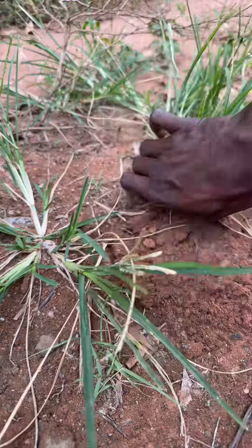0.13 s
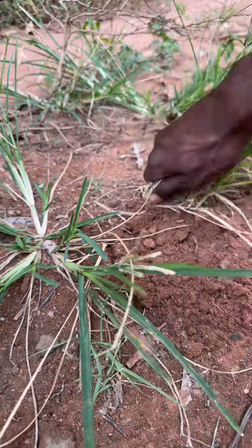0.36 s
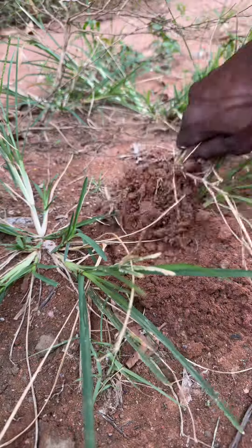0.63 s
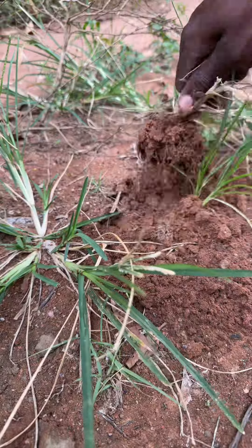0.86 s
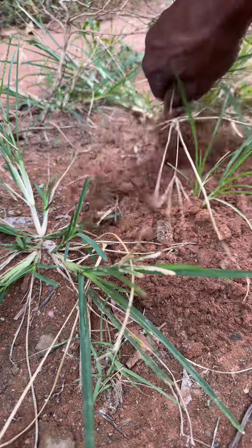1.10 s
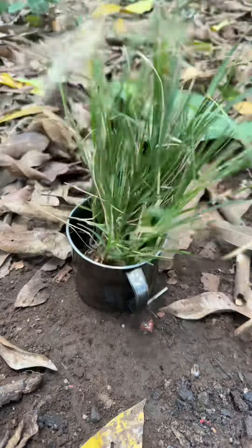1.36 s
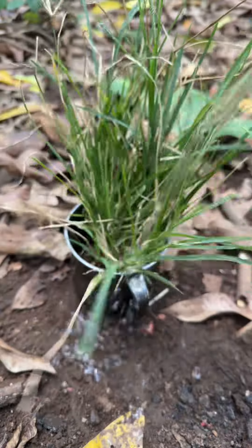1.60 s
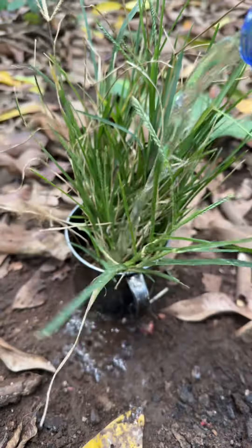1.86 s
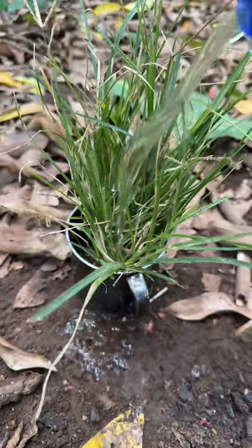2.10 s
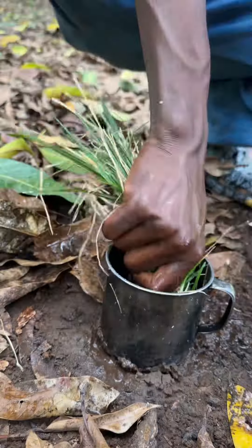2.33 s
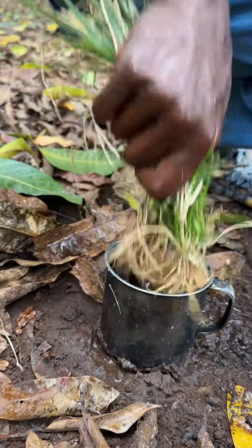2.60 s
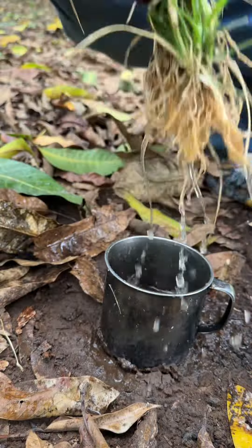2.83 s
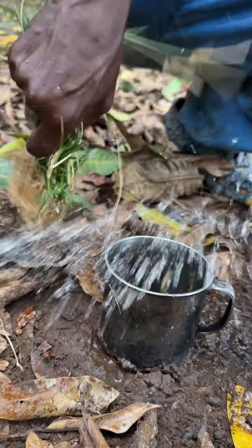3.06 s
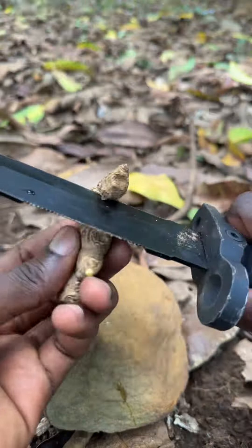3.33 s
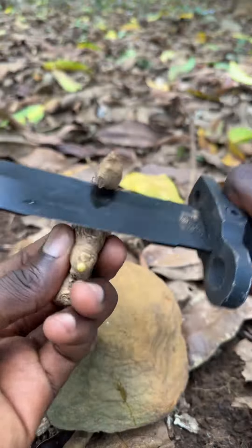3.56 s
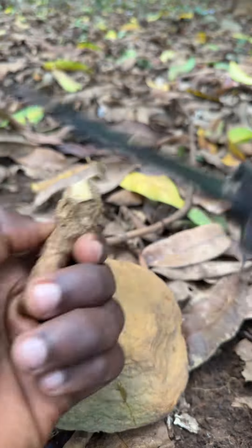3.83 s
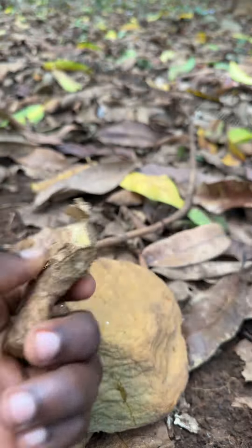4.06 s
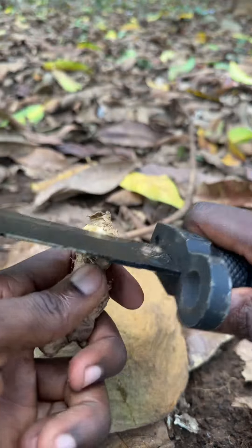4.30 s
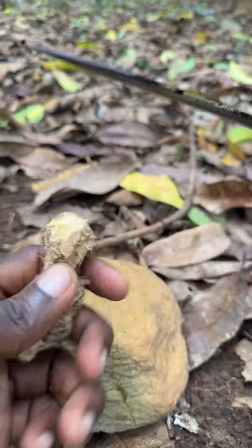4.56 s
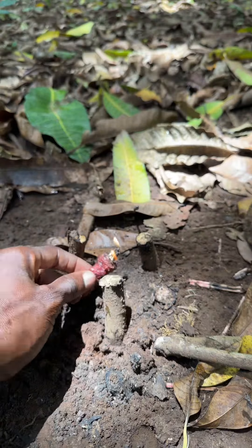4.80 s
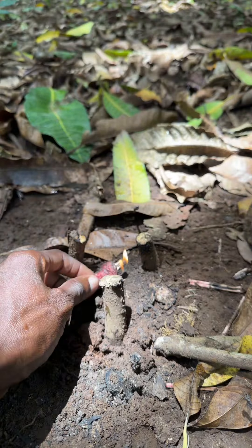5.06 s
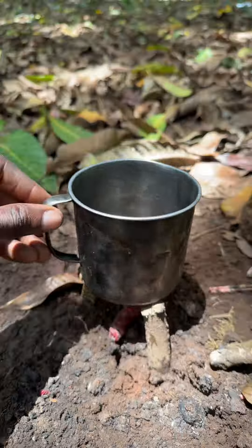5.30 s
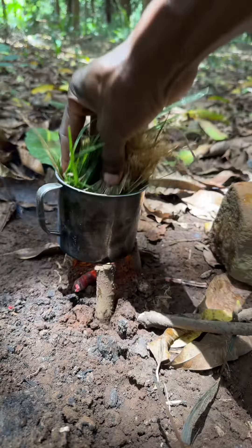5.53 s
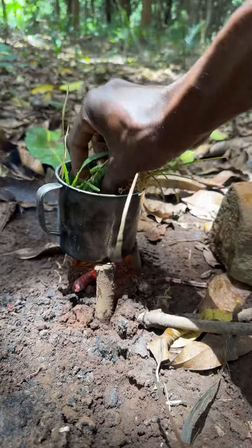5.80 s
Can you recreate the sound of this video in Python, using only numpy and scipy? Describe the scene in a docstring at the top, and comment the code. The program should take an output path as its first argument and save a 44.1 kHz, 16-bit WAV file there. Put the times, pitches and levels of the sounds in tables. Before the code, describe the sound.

Close, dry outdoor sounds in short, abruptly cut shots. Wind rumble and soft air hiss open the scene, with faint bird whistles; at 0.4-0.55 s roots tear in a cluster of rough low pops, with a tick near 1.0. At 1.15-1.25 s grass rustles brightly and knocks a steel mug, briefly clanking. From 1.4 to 2.2 s water splashes through the grass with sharp slaps and small bubbles. It quietens, then drops plink hollowly inside the mug from 2.6, strongest near 2.75 and 2.94. At 3.0 s comes the loudest event, a wet whipping crack. Bird chirps and a faint low hum follow while a knife snaps a root at 3.5 and 3.68, with thin high blade rings, and cuts again at 4.3-4.5. Near silence, faint finger rustle at 4.85, soft mug taps at 5.14 and 5.29, then grass crushed in from 5.38, with small snaps at 5.54 and 5.73.

```python
"""Outdoors on open ground, in short shots cut together, the microphone close to the hands: a grass tuft is torn
from the soil, set in a steel mug and watered, lifted dripping and shaken; a knife pares a root; the mug is set
on a stand and stuffed with grass. Hands, grass and water are clouds of noise puffs and tiny rings; drops are
gliding bubbles, the mug a bank of modes, snaps and ticks short noise. Wind rumbles on the microphone, birds
whistle far off, a faint hum comes and goes, and the hiss of the air changes at two of the cuts."""
import sys
import numpy as np
from scipy import signal
from scipy.fft import rfft, irfft, next_fast_len
from scipy.io import wavfile
from scipy.ndimage import uniform_filter1d

SR = 44100
rng = np.random.default_rng(int(sys.argv[2]) if len(sys.argv) > 2 else 0)


def voltage_ratio(decibels):
    """Convert decibels (scalar or array-like) to amplitude ratios, 20 dB per decade."""
    exponent = np.asarray(decibels, float) / 20
    return 10 ** exponent


def log_audio(samples):
    """Write samples as a 16-bit WAV file to the path given in sys.argv[1]."""
    # one column per channel
    frames = np.atleast_2d(samples).T
    # limit to full scale, then quantise
    limited = np.clip(frames, -1, 1)
    pcm = np.round(limited * 32767).astype(np.int16)
    wavfile.write(sys.argv[1], SR, pcm)


N = 260631  # length in samples

# moments at which one shot gives way to the next: cut_s
CUTS_S = (1.137, 2.235, 3.172, 3.762, 4.66, 5.128, 5.38, 5.89)


def read(points, hz):
    """Reads a table on a log-frequency axis."""
    f, value = np.transpose(points)
    return np.interp(np.log(hz + 1), np.log(f + 1), value)


def evened(x):
    """Scales to rms 1."""
    return x / np.sqrt(np.mean(x ** 2) + 1e-20)


def coloured(x, colour):
    """Filters by a spectrum of (hz, relative db), then scales to rms 1."""
    size = next_fast_len(len(x) + 4096)
    hz = np.fft.rfftfreq(size, 1 / SR)
    filtered = irfft(rfft(x, size) * voltage_ratio(read(colour, hz)), size)
    return evened(filtered[:len(x)])


def wander(hz):
    """Slow random drift of rms 1: noise averaged twice over 1 / hz seconds."""
    width = int(SR / hz)
    once = uniform_filter1d(rng.standard_normal(N), width)
    return evened(uniform_filter1d(once, width))


def add(mix, s, sound, pan_db=0):
    """Mixes a sound in at time s; pan_db is left against right."""
    part = mix[:, round(s * SR):][:, :len(sound)]
    sides = voltage_ratio(np.array([[.5], [-.5]]) * pan_db)
    part += sides * sound[:part.shape[1]]


def dying(seconds, t60, rise):
    """Time axis and an envelope with a quick rise and an exponential fall."""
    t = np.arange(round(seconds * SR)) / SR
    return t, (1 - np.exp(-t / rise)) * voltage_ratio(-60 * t / t60)


def air():
    """Wide hiss of the place: coloured noise in the middle and at the side, with a gently drifting level."""
    # air from each moment on: start_s, mid_level_db, side_level_db,
    # mid colour and side colour as (hz, relative_db)
    airs = [(0, -69.5, -65, [(180, -29), (300, -4), (1300, -33.5), (1690, -16.5), (2210, -10.5), (8360, -6),
            (9550, -8.5), (10600, -52), (11700, -16.5), (14500, -27), (16000, -19)], [(180, -25), (300, 10),
            (519, -1), (7950, -8), (10200, -2), (11700, -13), (12500, -40), (13500, -9), (16000, -13)]),
            (1.137, -70.5, -71, [(180, -47), (300, -4.5), (915, -12), (1300, -14), (2520, -2), (5700, -6),
            (6960, -9), (7320, -43.5), (8640, -34), (9090, -22.5), (10600, -22), (13100, -27),
            (16000, -58.5)], [(180, -43.5), (300, -10), (2320, -11), (2570, -6), (3950, -25), (8500, -6),
            (9880, -16), (10900, -44), (16000, -22)]), (3.763, -77.5, -76, [(180, -45), (300, 1),
            (1010, -7.5), (2140, -2.5), (2840, -8.5), (6100, -6), (6850, -5), (7200, -92), (8640, -62),
            (9090, -17), (10200, -16), (12500, -21), (16000, -46)], [(180, -25), (300, -8), (2070, -18),
            (2980, -13.5), (4020, -22), (6620, -10), (8940, -19), (10700, -34), (16000, -33)])]
    out = np.zeros((2, N))
    starts = [round(row[0] * SR) for row in airs] + [N]
    for k, (_, mid_db, side_db, mid_colour, side_colour) in enumerate(airs):
        span = slice(starts[k], starts[k + 1])
        noise = rng.standard_normal((2, starts[k + 1] - starts[k]))
        mid = voltage_ratio(mid_db) * coloured(noise[0], mid_colour)
        side = voltage_ratio(side_db) * coloured(noise[1], side_colour)
        out[:, span] = mid + side, mid - side
    return out * voltage_ratio(0.65 * wander(hz=7.7))


def wind():
    """Lumpy rumble on the microphone, nearly alike left and right; gusts rise faster than they fall."""
    # steady wind from each moment on, before it wanders: start_s, level_db
    steady = [(0, -55.5), (1.135, -73.5), (2.235, -76.5), (2.989, -70), (4.62, -73)]
    # rumble spectrum: hz, relative_db
    rumble_colour = [(21, -33), (36, -8.5), (78, -0.5), (119, -5), (232, -7), (301, -11.5), (386, -19.5),
                     (700, -32), (910, -48), (1540, -120)]
    # gusts and bumps on the microphone, before they wander: peak_s, level_db
    gusts = [(.45, -50), (.93, -63), (1.401, -56), (1.77, -59), (2.089, -63), (3.001, -64), (3.5, -55),
             (4.3, -60.5), (4.54, -69.5), (5.16, -76)]
    rise_db_per_s, fall_db_per_s = 250.5, 133.5
    t = np.arange(N) / SR
    starts, calm_db = np.transpose(steady)
    peaks, gust_db = np.transpose(gusts)[:, :, None]
    gusts_db = gust_db - np.maximum(rise_db_per_s * (peaks - t), fall_db_per_s * (t - peaks))
    current = np.maximum(np.searchsorted(starts, t, "right") - 1, 0)
    calm = uniform_filter1d(voltage_ratio(calm_db)[current], size=400)  # short ramps between the steps
    level = calm * voltage_ratio(2.5 * wander(hz=23)) + voltage_ratio(gusts_db.max(0) + 5.5 * wander(hz=30.2))
    common = coloured(rng.standard_normal(N), rumble_colour)
    apart = coloured(rng.standard_normal(N), rumble_colour)
    return level * np.array([common + voltage_ratio(-18.5) * apart, common - voltage_ratio(-10.5) * apart])


def hum():
    """Faint far hum: low sines that waver in pitch and level."""
    # tones around which the hum wavers: pitch_hz, level_db (raised 1.5 dB below)
    tones = [(107.7, -72.5), (199.2, -72)]
    t = np.arange(N) / SR
    on = uniform_filter1d(1. * (t > 2.99) * (t < 4.58), size=800)
    out = np.zeros(N)
    for hz, db in tones:
        level = voltage_ratio(db + 1.5 + 2.7 * wander(hz=8))
        pitch = hz + 4 * wander(hz=6.7)
        out += level * np.sin(2 * np.pi * np.cumsum(pitch) / SR)
    return on * out


def chirp(db, from_hz, to_hz, length):
    """A bird's whistle: one sine gliding evenly from pitch to pitch."""
    t = np.arange(round(length * SR)) / SR
    pitch = from_hz + (to_hz - from_hz) * t / length
    return voltage_ratio(db) * np.hanning(len(t)) ** 0.13 * np.sin(2 * np.pi * np.cumsum(pitch) / SR)


def echoes(x, t60, db):
    """Adds scattered returns from ground and trees: a dying noise tail, a different one at each ear."""
    t, shape = dying(.3, t60, rise=0.0085)
    tail = rng.standard_normal((2, len(t))) * shape
    tail /= np.linalg.norm(tail[0])
    return x + voltage_ratio(db) * signal.oaconvolve(x, tail, axes=1)[:, :N]


def blade_ring(db):
    """The knife blade rings as one high dying sine."""
    t, shape = dying(0.24, t60=0.1, rise=0.0012)
    return voltage_ratio(db) * shape * np.sin(2 * np.pi * 12040 * t)


def knock(db, best_hz, damped_hz):
    """Modes of the mug: the spot struck favours one, hand or grass shortens others."""
    # modes of the steel mug: pitch_hz, relative_db, free t60_s
    mug = [(385, -6, .15), (850, -4, .4), (1362, -10, .5), (2095, -6, .5), (2200, -8, .18), (2310, -6, .1),
           (2520, -9, .2), (2650, -5, .13), (2900, -9, .18), (3045, -9, .35), (3510, -7, .22),
           (4030, -4, .11), (4980, -4, .13), (6180, -14, .1)]
    hz, mode_db, t60 = np.transpose(mug)[:, :, None]
    t = np.arange(SR // 2) / SR
    t60 = t60 * np.where(np.isin(hz, damped_hz), 0.28, 1)
    level_db = mode_db + 6 * (hz == best_hz) - 60 * t / t60
    modes = voltage_ratio(level_db) * np.sin(2 * np.pi * (hz * t + rng.random(hz.shape)))
    x = modes.sum(0) * (1 - np.exp(-t / .0015))
    return voltage_ratio(db) * x / abs(x).max()


def tick(db):
    """A dry tick: a few milliseconds of bright noise with no ring."""
    # tick spectrum: hz, relative_db
    tick_colour = [(500, -28), (1500, -7.5), (6000, -2), (9000, -10.5), (13000, 6), (16000, -22)]
    t, shape = dying(.03, t60=0.013, rise=0.00011)
    x = shape * coloured(rng.standard_normal(len(t)), tick_colour)
    return voltage_ratio(db) * x / abs(x).max()


def pop(db):
    """A rough pulse whose pitch falls at once, as the highs arrive first."""
    t, shape = dying(0.011, t60=0.046, rise=0.0011)
    pitch = 250 + 1580 * np.exp(-t / 0.001554)
    grit = coloured(rng.standard_normal(len(t)), [(150, -34), (500, 4), (1500, -15.5), (3000, -21), (8000, -32)])
    return voltage_ratio(db - 5.5) * shape * (np.sin(2 * np.pi * np.cumsum(pitch) / SR) + 0.46 * grit)


def snap(db, hz):
    """A sharp wide crack, and the short ring it leaves at one pitch."""
    t, shape = dying(0.067, t60=0.046, rise=0.00083)
    force = rng.standard_normal(len(t)) * (1 + 3 * np.exp(-t / 0.0018))  # hardest at the break
    crack_colour = [(400, -24), (1200, 5.5), (5500, 14), (7500, -31), (12000, -16), (16000, -40)]
    crack = coloured(force * voltage_ratio(-60 * t / 0.054), crack_colour)
    r = np.exp(-np.pi * .16 * hz / SR)  # bandwidth is 0.16 of the pitch
    body = signal.lfilter([1, 0, -1], [1, -2 * r * np.cos(2 * np.pi * hz / SR), r * r], force) * shape
    x = body / abs(body).max() + crack / abs(crack).max()
    return voltage_ratio(db - 4) * x / abs(x).max()


def drip(db, hz, rise_share, t60):
    """A tick as the drop lands; its bubble swells, glides in pitch and dies."""
    t, swell = np.arange(round(.3 * SR)) / SR, .08 * t60
    shape = np.minimum(t / swell, 1) ** 0.44 * voltage_ratio(-60 * np.maximum(t - swell, 0) / t60)
    pitch = hz * (1 + rise_share * (1 - np.exp(-t / (swell + 0.002))))
    bubble = shape * np.sin(2 * np.pi * np.cumsum(pitch) / SR)
    tick_colour = [(800, -13), (3000, 19), (6500, -14), (9000, -17), (16000, -32)]
    landing = voltage_ratio(-21 - 60 * t / 0.011) * coloured(rng.standard_normal(len(t)), tick_colour)
    return voltage_ratio(db) * (bubble + landing)


def bubbles():
    """Rows for small random bubbles while the water pours, the high ones short."""
    count, pour_from_s, pour_to_s = 40, 1.5, 2.22
    low_hz, high_hz = 1500, 5500
    when, size, pitch, glide = rng.random((count, 4)).T
    start = np.interp(when, [0, 1], [pour_from_s, pour_to_s])
    hz = low_hz * (high_hz / low_hz) ** pitch ** 2
    t60 = 55 / hz  # 55 cycles
    return np.transpose([start, -52 - 17 * size, hz, .15 * glide, t60])


def action(start, peak, db, fade_db, treble_db, end):
    """Random grains of uneven size, tiny puffs and tiny rings; one swell and fade drives body and treble."""
    # grain from each moment on: start_s, grains_per_s, size_spread_db, decay_s (60 dB), rings_db (relative),
    # colour as (hz, relative_db). In turn: soil crumbles off the roots; the tuft slides into the mug; water
    # splashes through the grass; wet roots rise; the tuft is whipped dry; the blade bites and the tip breaks
    # off; fingers turn the root and cut again; fingers at the kindling; the mug scrapes its stand; grass is
    # crushed into the mug
    grains = [(0, 3000, 2.7, 0.016, -9, [(240, -35.5), (400, -17), (484, 0), (2690, -4.5), (7000, -5),
              (9100, -31), (15400, -120)]), (1.1, 5150, 3.6, 0.0092, -4, [(240, -58.5), (400, -35),
              (546, -18.5), (728, 2), (1200, -21), (1290, -7), (2090, 1.5), (3290, -8.5), (5130, -1.5),
              (7000, -19), (9100, -63), (15400, -120)]), (1.355, 1213, 1.6, 0.027, 1, [(240, -62.5),
              (400, -22.5), (702, -6.5), (947, -22.5), (1190, -18), (2140, 1), (2650, -5.5), (5580, -5.5),
              (7000, -23.5), (9100, -64), (15400, -120)]), (2.23, 2017, 4.9, 0.017, 4.5, [(240, -60),
              (400, -18.5), (2470, -2), (3850, -11), (4830, -7.5), (7000, -26.5), (9100, -58.5),
              (15400, -120)]), (2.98, 2558, 2.4, 0.0042, 2, [(120, -28.5), (200, -7), (1120, -14),
              (1250, -9.5), (2070, 2.5), (4680, -11), (7000, -25), (9100, -56), (15400, -120)]),
              (3.4, 2477, 6.6, 0.011, 0, [(240, -43), (400, -8.5), (1290, -17.5), (2470, -3.5), (3540, -10),
              (5380, -16), (7000, -29.5), (9100, -58), (15400, -120)]),
              (3.9, 2975, 2.9, 0.0031, -2.5, [(240, -46), (400, -16.5), (1080, -19), (2530, -1),
              (2990, -9.5), (5640, -13.5), (7000, -27), (9100, -60.5), (15400, -120)]),
              (4.8, 2005, 3.9, 0.0056, -4, [(240, -32), (400, 0), (1570, -18), (1990, -0.5), (7000, -24),
              (9100, -53), (15400, -120)]), (5.11, 2905, 2.4, 0.0042, -14, [(180, -48), (300, -14),
              (380, -9.5), (861, -1.5), (982, -13), (2610, -3.5), (7000, -16), (9100, -48), (15400, -120)]),
              (5.35, 1982, 1.9, 0.013, -5.5, [(240, -47), (400, -9), (514, -25), (1340, -11), (1550, -10.5),
              (2040, 5), (2350, -9.5), (5580, -12.5), (7000, -13), (9100, -52), (15400, -120)])]
    _, per_s, spread_db, decay, rings_db, colour = [row for row in grains if row[0] <= peak][-1]
    t = np.arange(start, end, 1 / SR)
    rise_db = 28 * (t - peak) / max(peak - start, 1e-3)
    swing_db = np.where(t < peak, rise_db, fade_db * (peak - t))
    body_db = db + swing_db
    treble_db = db + treble_db + 1.11 * swing_db  # the treble swings a little further

    hit, size = rng.random(len(t)), rng.exponential(1, len(t))
    grain = (hit < per_s / SR) * voltage_ratio(spread_db * np.minimum(size, 4))
    power = signal.lfilter([1], [1, -np.exp(-np.log(1e6) / (decay * SR))], grain ** 2)
    puffs = np.sqrt(power + 0.042) * rng.standard_normal(len(t))

    kind = (hit * SR / per_s * 30).astype(int)  # shares the grains out among 30 pitches
    rings = np.zeros(len(t))
    for k, hz in enumerate(np.geomspace(600, 6600, num=30)):
        r = np.exp(-hz / (6 * SR))  # each ring lasts some cycles of its own pitch
        turn = 2 * np.pi * hz / SR
        rings += hz * signal.lfilter([np.sin(turn)], [1, -2 * r * np.cos(turn), r * r], grain * (kind == k))

    x = coloured(evened(puffs) * np.sqrt(22050 / 6000) + voltage_ratio(rings_db) * evened(rings), colour)
    body = signal.sosfiltfilt(signal.butter(8, 7000, fs=SR, output="sos"), x)
    main = signal.sosfilt(signal.butter(4, [3000, 6500], "band", fs=SR, output="sos"), x)  # sets the level
    treble = coloured(puffs, [(6000, -50), (7000, -5), (9000, -3.5), (16000, -12)])
    x = voltage_ratio(body_db) * body / np.std(main) + voltage_ratio(treble_db + 7) * treble
    return x * signal.windows.tukey(len(t), 100 / len(t))


def hollow(x):
    """Adds the narrow ring of the air in the mug, stirred by what rustles inside it."""
    # ringing air: start_s, end_s, pitch_hz
    hollows = [(1.13, 1.295, 2100), (1.5, 2.235, 2090), (2.632, 2.976, 2400)]
    width_hz, ring_db = 130, 3.5
    t, out = np.arange(N) / SR, x.copy()
    for start, end, hz in hollows:
        inside = x * (t > start) * (t < end)
        out += voltage_ratio(ring_db) * signal.lfilter(*signal.iirpeak(hz, hz / width_hz, SR), inside)
    return out


def treble_gaps(x):
    """Spreads the rustles: middle and side, a quarter turn apart in phase, have gaps at different pitches."""
    # one row for the first shot, one for all later ones: middle, side, each as (hz, gain_db)
    gaps = [([(9500, 0), (9900, -29), (10900, -25), (11300, -1), (13700, -1.5), (14200, -21), (15200, -26),
            (15500, -5.5)], [(1000, 2), (11300, -1.5), (11800, -40), (13000, -38), (13400, 1)]),
            ([(6800, -3), (7200, -57), (8700, -31.5), (9100, -2), (13700, 0), (14300, -38.5)],
            [(1500, -11.5), (3000, -27), (5000, -19), (6200, -4.5), (10200, -2.5), (10600, -39),
            (13300, -39.5), (13700, 0)])]
    size, late = next_fast_len(N, True), np.arange(N) >= CUTS_S[0] * SR
    hz, out = np.fft.rfftfreq(size, 1 / SR), np.zeros((2, N))
    for (mid_gaps, side_gaps), shot in zip(gaps, (~late, late)):
        z = rfft(x * shot, size)
        mid = irfft(z * voltage_ratio(read(mid_gaps, hz)), size)[:N]
        side = irfft(1j * z * voltage_ratio(read(side_gaps, hz)), size)[:N]
        out += mid + side, mid - side
    return out


def scene():
    """Near sounds with a short echo and birds with a long one, over rustles, air, wind and hum."""
    # far birds: start_s, level_db, from_hz, to_hz, length_s
    chirps = [(0, -74, 865, 888, 0.33), (0, -75.5, 1833, 1833, 0.21), (0.684, -72, 1703, 1708, 0.16),
              (3.23, -67.5, 3580, 3520, 0.065), (3.37, -73, 3540, 3590, 0.11),
              (3.325, -55, 1480, 3820, 0.019), (3.349, -58.5, 3050, 4340, 0.014),
              (3.405, -69.5, 406, 447, 0.046), (3.52, -65, 480, 440, 0.068), (3.536, -56, 1410, 3600, .025),
              (3.562, -58, 3080, 4700, 0.015), (4.066, -68, 3050, 3010, 0.012),
              (4.287, -68, 5750, 5940, 0.11), (4.3, -79, 4610, 4800, 0.085),
              (4.318, -79.5, 2306, 2390, 0.09)]
    # rings of the knife blade: start_s, level_db
    blade_rings = [(3.46, -62), (3.505, -51), (3.748, -58), (4.29, -49.5)]
    # knocks on the mug: start_s, peak_db, left_right_db, best_struck_hz, damped modes (hz)
    knocks = [(1.165, -44, -3, 2095, (850, 1362, 3045, 385)), (1.18, -35, -3, 4980, (850, 3045, 2650, 385)),
              (1.198, -41, -3, 2095, (1362, 3045, 385)), (1.235, -40, -3, 2095, (850, 1362, 3045, 385)),
              (5.137, -47, -4, 4980, (850, 2095, 3045, 385)),
              (5.159, -45, -2, 1362, (850, 2095, 3045, 385)), (5.292, -42, -3, 3045, (850, 2095, 1362))]
    # dry bright ticks: start_s, peak_db
    ticks = [(.9932, -31.5), (1.3653, -37.5), (1.3872, -43), (2.638, -48), (2.836, -46), (3.0022, -27),
             (3.68, -39.5), (3.49, -35.5), (3.505, -27), (4.04, -50.5), (4.419, -54), (5.293, -48),
             (5.385, -47), (5.7347, -36)]
    # roots tear and drops hit the soil: start_s, drive_db, left_right_db
    pops = [(0.337, -50, 10), (0.407, -33, 5.5), (0.415, -38, -14), (0.458, -26, 1), (0.462, -33.5, 8),
            (0.473, -32, 10.5), (0.48, -37, -19.5), (0.509, -27.5, 5), (0.53, -29, 4), (1.751, -46.5, -2),
            (2.07, -44, -1)]
    # snaps of fibre and slaps of water: start_s, drive_db, centre_hz
    snaps = [(1.365, -37.5, 1810), (1.3875, -30.5, 1668), (1.4044, -41, 5360), (1.4397, -36, 2580),
             (1.4603, -36.5, 2700), (1.482, -38, 1800), (1.8081, -42, 4140), (1.8576, -30.5, 1980),
             (1.879, -28.5, 1864), (1.946, -29.5, 2030), (1.9819, -30.5, 1900), (2.042, -40, 5490),
             (2.1025, -34.5, 2015), (2.128, -34, 2290), (2.1477, -33.5, 1886), (2.1784, -33, 1945),
             (2.2227, -44.5, 2160), (2.4247, -44.5, 4750), (2.5232, -41.5, 2014), (2.8347, -33.5, 5050),
             (2.8612, -30, 2503), (2.9978, -22.5, 2380), (3.0023, -12, 2530), (3.016, -19.5, 2010),
             (3.1657, -33, 1726), (3.487, -31.5, 2316), (3.5008, -25, 2800), (3.506, -22, 2580),
             (3.6575, -29.5, 1924), (3.678, -28, 2370), (3.6818, -20, 2140), (4.039, -33.5, 2336),
             (4.4188, -28, 3400), (4.4268, -26, 2740), (4.51, -35, 2500), (4.5198, -33.5, 1915),
             (5.0455, -56, 2730), (5.26, -51, 1900), (5.3844, -46, 2200), (5.54, -33, 2066)]
    # drops into the mug: start_s, level_db, pitch_hz, pitch rise as a share, t60_s
    drips = [(1.817, -39, 4140, 0.068, 0.016), (1.835, -55, 750, 0.071, 0.077),
             (1.862, -43, 743, -0.023, 0.054), (1.882, -42, 735, -0.074, 0.058),
             (1.953, -52, 734, -0.12, 0.045), (1.985, -51, 707, -0.076, 0.042), (2.0, -56, 684, -.05, .04),
             (2.123, -42, 4200, -0.013, 0.018), (2.14, -42.5, 5900, -.02, .02),
             (2.285, -52, 1430, 0.03, .04), (2.427, -55, 1500, -0.04, 0.033),
             (2.57, -54, 2380, -0.0046, 0.17), (2.638, -39, 5270, -0.015, 0.017),
             (2.65, -52, 2520, .04, 0.018), (2.663, -48, 5760, .02, 0.017),
             (2.671, -43.5, 3600, 0.038, 0.023), (2.695, -30, 2660, -.09, 0.033),
             (2.705, -49, 5300, 0, .02), (2.711, -46, 3390, .02, 0.027), (2.724, -47, 1110, 0.28, 0.02),
             (2.742, -43, 2370, -.12, 0.064), (2.749, -22, 2340, -0.16, 0.014),
             (2.754, -20.5, 2253, .15, 0.029), (2.76, -44, 3200, 0.26, .03), (2.797, -48, 4300, 0, 0.011),
             (2.804, -45, 530, 0, 0.053), (2.804, -50.5, 2400, -0.075, .03),
             (2.816, -38.5, 1174, .04, 0.064), (2.85, -41.5, 2405, 0.016, 0.032),
             (2.885, -41.5, 2480, 0.028, 0.13), (2.889, -38.5, 1520, 0.15, 0.023),
             (2.89, -41.5, 3620, 0.0015, 0.031), (2.917, -38, 1200, 0.00076, 0.029),
             (2.932, -32.5, 2134, -0.019, 0.028), (2.938, -19, 2400, -0.069, 0.024),
             (2.94, -38.5, 1930, -0.011, 0.17), (2.947, -22.5, 2369, 0.0029, 0.11),
             (2.971, -35, 2300, -0.02, 0.049)]
    # hands, grass, water and blade, each lasting to the next or to a cut:
    # start_s, peak_s, level_db, fade_db_per_s (negative grows), treble_offset_db
    actions = [(0, 0.001, -69, -4, -2.5), (0.579, 0.625, -72, 0, 0), (0.969, 0.986, -58, 80, 4),
               (1.138, 1.182, -37.5, 213.5, -11.5), (1.376, 1.387, -48, 134, -8.5),
               (1.519, 1.583, -53, 78, -5.5), (1.707, 1.727, -51, 237.5, -14),
               (1.8, 1.808, -50.5, 74, -14.5), (1.935, 1.94, -53, 51, -11.5),
               (2.084, 2.124, -47.5, 68.5, -17.5), (2.234, 2.235, -68, -6, -16.5),
               (2.63, 2.649, -64.5, -40, -18), (2.986, 2.998, -28, 172, -19),
               (3.443, 3.485, -53.5, 211, -4.5), (3.65, 3.656, -47.5, 302, -23.5),
               (3.676, 3.676, -37, 339.5, -22.5), (3.949, 3.968, -80, 17.5, -11.5),
               (4.229, 4.242, -56.5, -120, -10), (4.278, 4.291, -53.5, 600, -7.5),
               (4.414, 4.42, -40, 470, -25), (4.498, 4.506, -54.5, 180, -22.5),
               (4.841, 4.872, -77.5, 85, -21), (5.128, 5.141, -53.5, 221, -14.5),
               (5.285, 5.293, -53, 480, -7.5), (5.38, 5.396, -55.5, 33, -10.5)]
    near, bird, rustle = np.zeros((3, 2, N))
    for s, *row in chirps:
        add(bird, s, chirp(*row), 3)
    for s, db in blade_rings:
        add(near, s, blade_ring(db))
    for s, db, pan_db, *spot in knocks:
        add(near, s, knock(db, *spot), pan_db)
    for s, db in ticks:
        add(near, s, tick(db), -1.5)
    for s, db, pan_db in pops:
        add(near, s, pop(db), pan_db)
    for s, *row in snaps:
        add(near, s, snap(*row), -1.5)
    for s, *row in [*drips, *bubbles()]:
        add(near, s, drip(*row), -1.5)
    next_starts = [row[0] for row in actions[1:]] + [N / SR]
    for row, next_start in zip(actions, next_starts):
        next_cut = min(cut for cut in CUTS_S if cut > row[1])
        add(rustle, row[0], action(*row, min(next_start, next_cut)))
    wide = treble_gaps(hollow(rustle[0])) * voltage_ratio(0) * np.array([[1], [1]]) * voltage_ratio([[-.7], [.7]])
    background = air() + wind() + hum() + echoes(bird, t60=0.32, db=0.5)
    return background + echoes(near, t60=0.013, db=-9) + wide


def band_limit(x):
    """A steep low-pass at the top of the band."""
    return signal.sosfilt(signal.butter(12, 16470, fs=SR, output="sos"), x)


def record(dry):
    """Passes on the finished mix."""
    return band_limit(dry)


dry = scene()
out = record(dry)
log_audio(out)
```